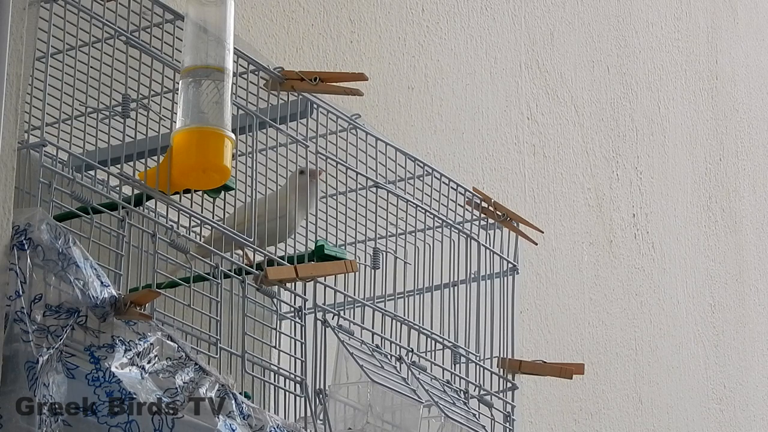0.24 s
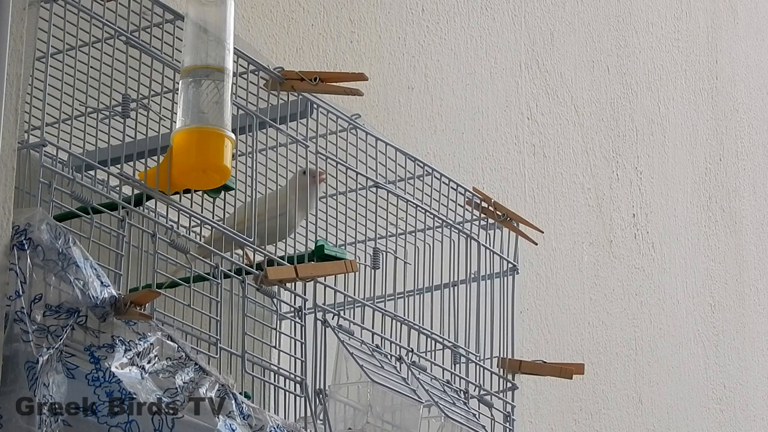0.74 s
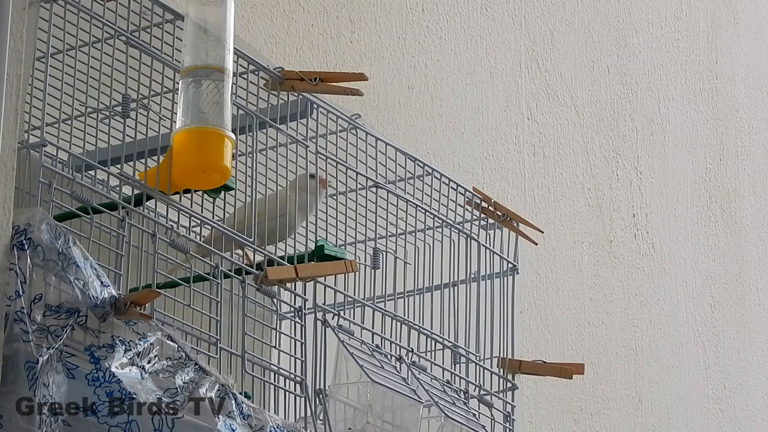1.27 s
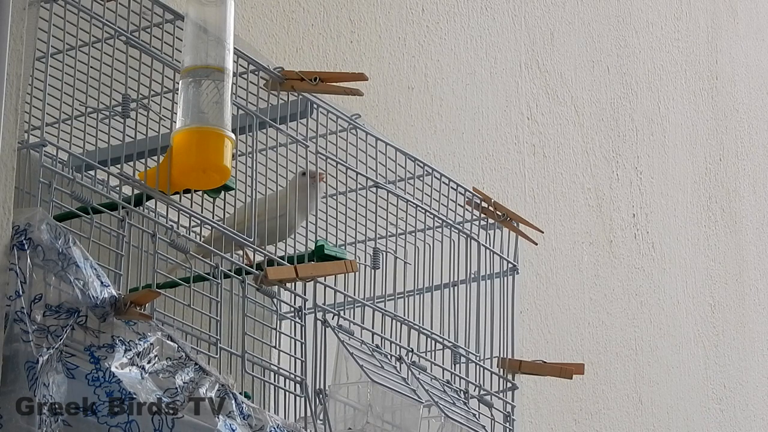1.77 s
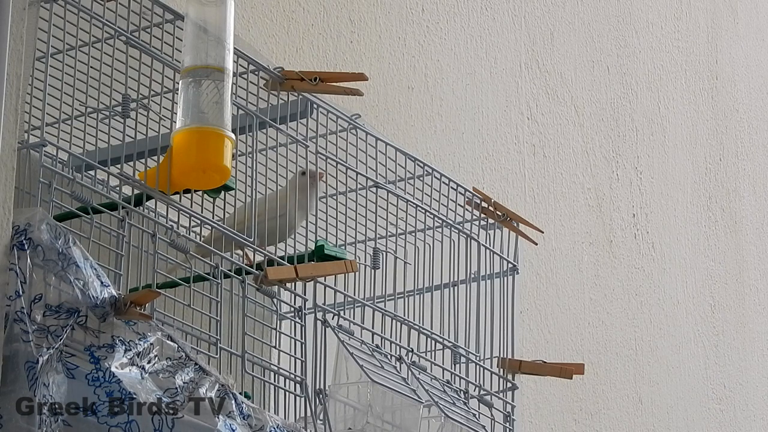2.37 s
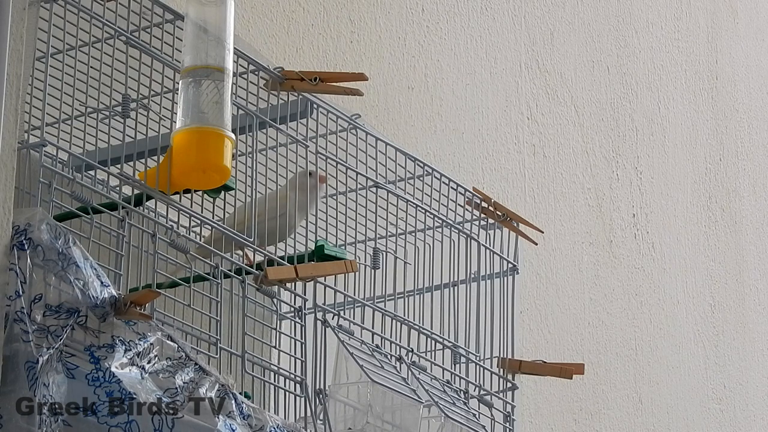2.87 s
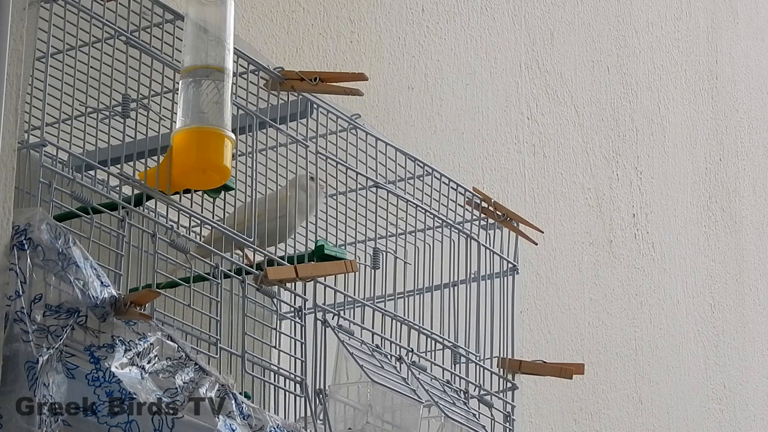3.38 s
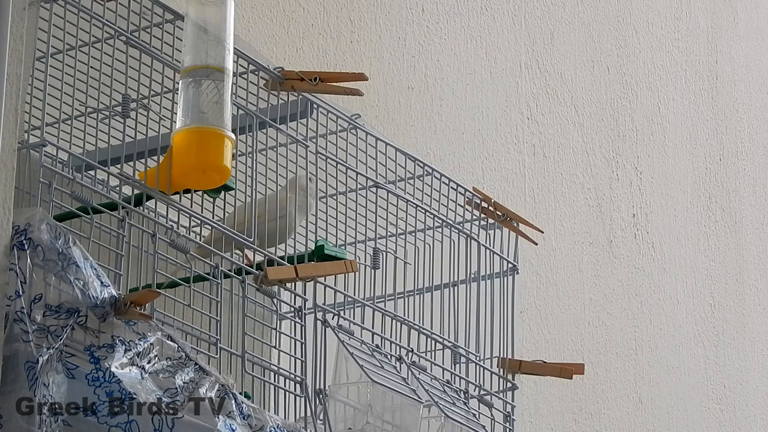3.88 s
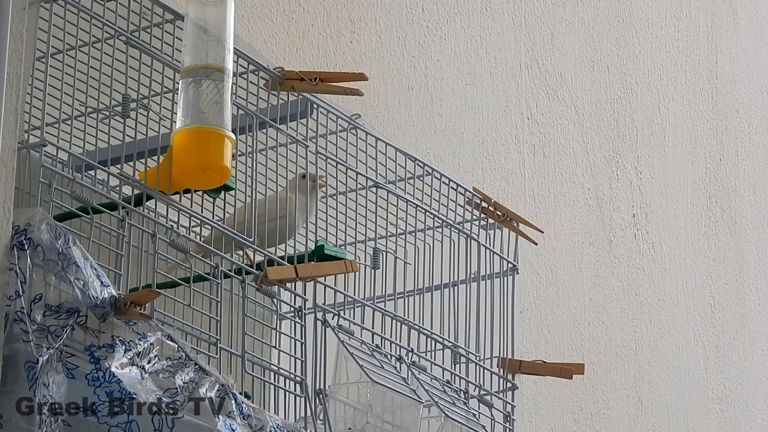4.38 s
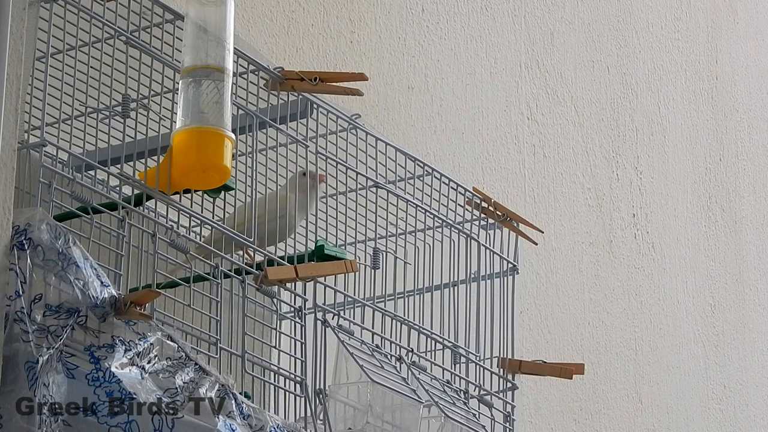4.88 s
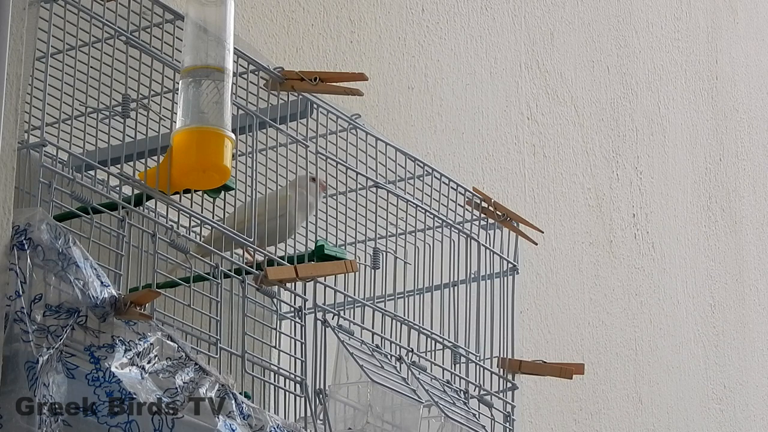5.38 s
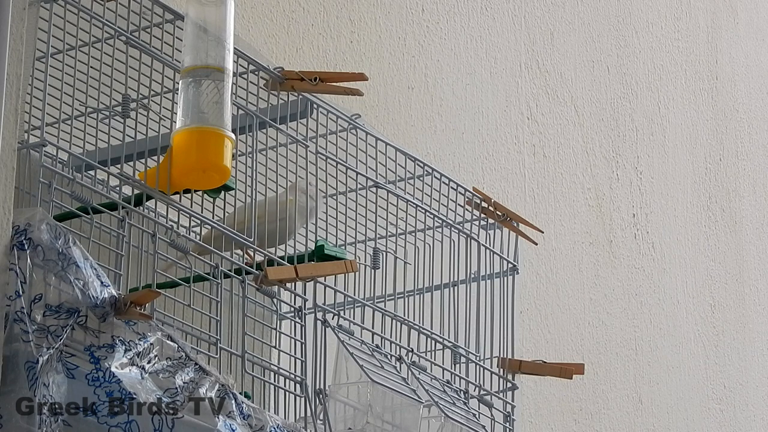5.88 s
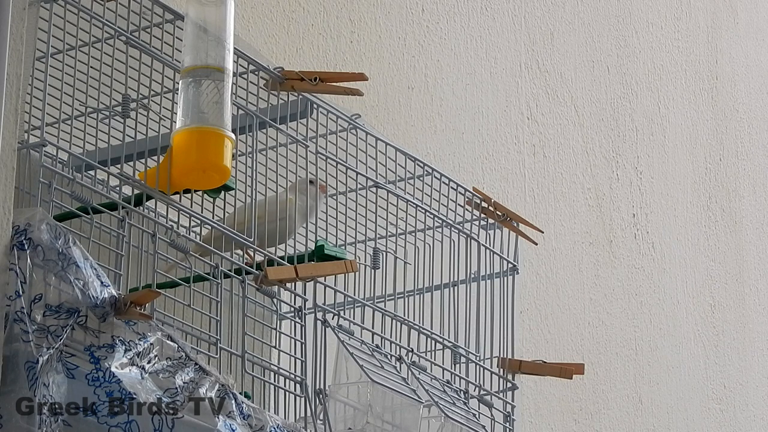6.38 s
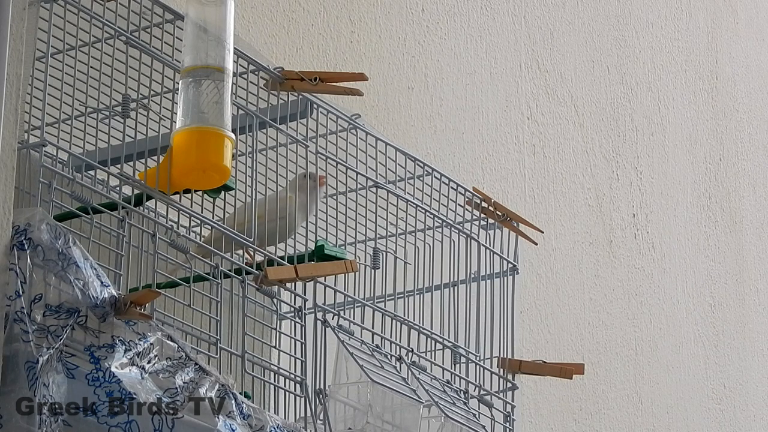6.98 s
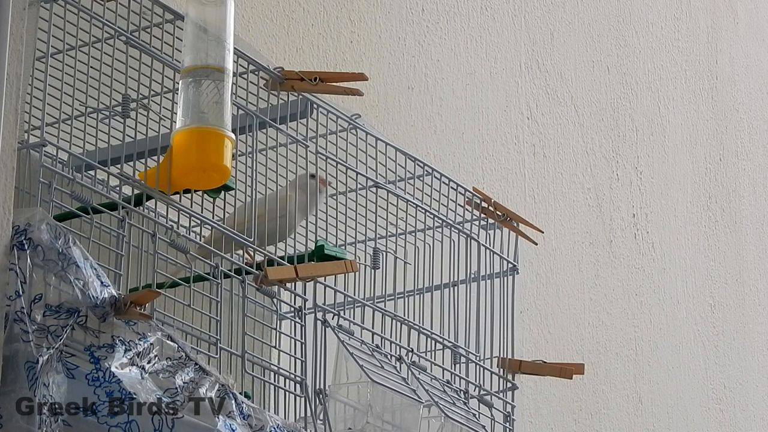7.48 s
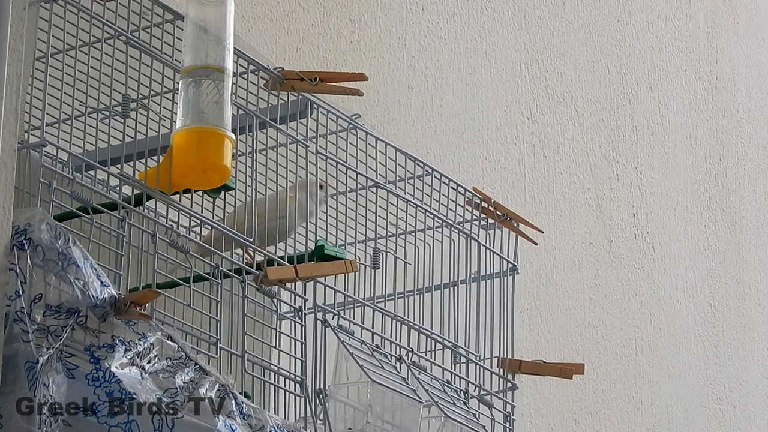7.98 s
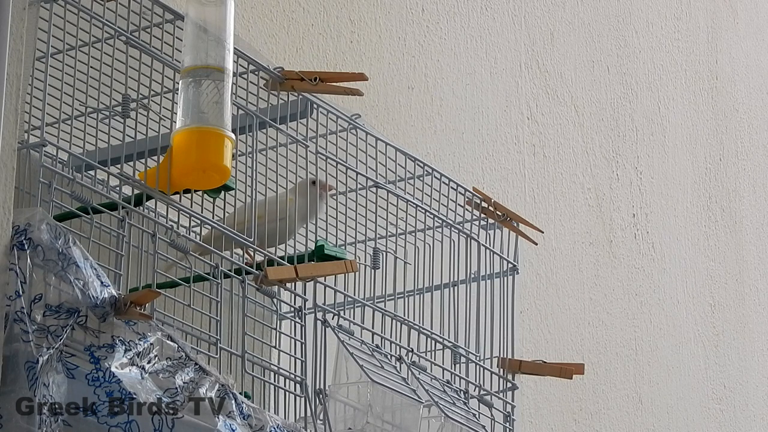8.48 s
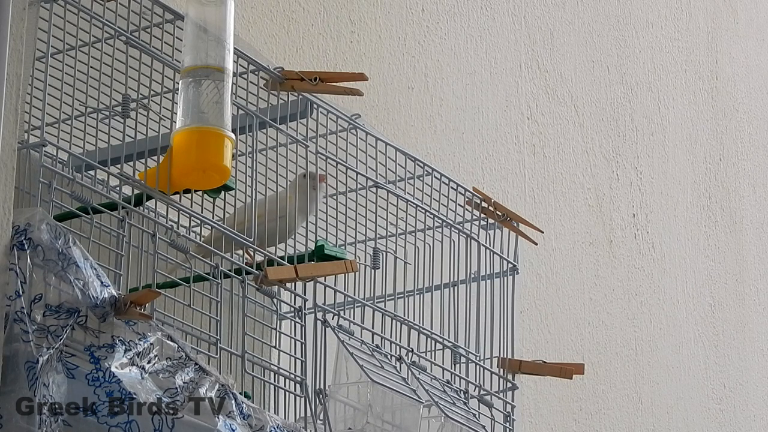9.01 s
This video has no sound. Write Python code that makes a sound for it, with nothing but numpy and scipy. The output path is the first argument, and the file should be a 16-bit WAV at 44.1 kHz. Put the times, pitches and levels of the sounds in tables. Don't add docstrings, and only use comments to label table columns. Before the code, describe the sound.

A canary sings brightly in a hard-walled room, changing from fast rolls to chopped notes, whips and bubbling trills, over faint town hum.

```python
import sys
import numpy as np
from scipy import signal
from scipy.fft import rfft, irfft
from scipy.io import wavfile
from scipy.ndimage import uniform_filter1d

SR = 44100
rng = np.random.default_rng(int(sys.argv[2]) if len(sys.argv) > 2 else 0)


def voltage_ratio(decibels):
    exponent = np.asarray(decibels, float) / 20
    return 10 ** exponent


def master(y):
    cut = np.clip(np.atleast_2d(y).T, -1, 1)
    pcm = np.round(cut * 32767)
    wavfile.write(sys.argv[1], SR, pcm.astype(np.int16))


N = 407925
LEAD = SR // 2

# time_s [s from the syllable], pitch_hz [Hz], level_db [dB]
ROLL_SHAPE = [
    [(0, 4750, 6), (.004, 4280, -3), (.012, 4010, -4), (.017, 3400, -0.5), (.022, 2960, -10.5),
     (.028, 2460, -11)],
]
PIP_SHAPE = [
    [(-.018, 6800, -35), (-.013, 6670, -9.5), (-.008, 6600, 0.5)],
]
TRIPLE_SHAPE = [
    [(-.028, 5190, -15.5), (.002, 4605, -1), (.03, 4324, -5), (.065, 4090, -11.5)],
    [(.068, 3690, -16), (.078, 3484, -1), (.096, 3420, -8.5)],
    [(.101, 2000, -7.5), (.107, 2600, -4.5), (.114, 2783, 0.5), (.132, 2880, -9)],
]
CHOP_SHAPE = [
    [(-.008, 4665, -8), (.008, 4110, -2.5), (.022, 3680, -2), (.032, 3460, -11.5)],
]
CLUCK_SHAPE = [
    [(.032, 2214, -15.5), (.037, 2664, -4), (.046, 2745, 4), (.06, 2598, -11.5)],
]
SCOOP_SHAPE = [
    [(-.014, 2736, -25), (0, 3210, 0), (.022, 3708, -1.5), (.045, 3980, -7.5), (.06, 4190, -19)],
]
BUBBLE_SHAPE = [
    [(-.006, 3055, 9), (-.001, 3280, -9), (.007, 3596, 0.5), (.011, 2750, -17), (.015, 2180, -9)],
    [(.02, 1976, -8), (.026, 2480, -9.5), (.031, 2990, -5), (.037, 3346, -10)],
    [(.025, 5380, 2), (.029, 4720, -11), (.034, 3840, -13.5)],
]
BELL_SHAPE = [
    [(.014, 4230, -5), (.019, 3870, -5), (.027, 3753, -1.5), (.032, 3430, 0.5), (.037, 3100, -2),
     (.043, 2750, -6.5)],
]
TICK_SHAPE = [
    [(-.003, 4520, -22.5), (0, 4680, -1), (.004, 4344, -7), (.008, 4250, -15.5), (.016, 4050, -18)],
]
WHIP_SHAPE = [
    [(0, 3025, -9.5), (.011, 3915, 0.5), (.018, 4850, 3), (.025, 5590, 2.5), (.037, 6134, 0.5),
     (.052, 6173, -11)],
]
PICKUP_SHAPE = [
    [(-.031, 1820, -10), (-.026, 2310, -7), (-.018, 2646, -5.5)],
]
CLOSE_SHAPE = [
    [(-.03, 1610, -22.5), (-.022, 2272, -12), (-.013, 2630, -9)],
    [(-.006, 2750, -17), (.006, 3197, -2), (.015, 3708, -2), (.028, 3975, -1), (.052, 4170, -9.5)],
]
ROLL = .065, [(-.098, 1, 0.84), (.156, -4.5, 0.87), (.416, -2.4, .88), (.682, -3, 0.86)]
TRIPLES = .3, [(1.1, -0.95, 1.0), (1.405, 0.24, .98), (1.705, -0.035, 0.99)]
CHOPS = .132, [(1.897, -1, 0.96), (2.684, 0.14, 0.96), (2.937, -1.2, 0.97), (3.202, -1.8, 0.95),
         (3.484, -1.4, 0.97)]
CLUCKS = .132, [(1.897, -3, 0.97), (2.684, -3, 0.97), (2.937, -3.5, 0.98), (3.203, -1.5, 0.99),
          (3.34, 1.5, 1), (3.483, -1.5, 0.99)]
SCOOPS = .3, [(3.614, -1.1, 0.98), (3.937, -1.2, 1.0), (4.227, 0.63, 1.0)]
BUBBLE = .0535, [(4.639, 1.5, .9), (4.85, 1.5, .94), (5.171, 0.6, .98), (5.227, 1, .96), (5.282, -5.5, .99)]
BELL = .0735, [(5.418, -1.5, 0.93), (5.497, -1, 0.95), (6.007, -1.17, .94), (6.379, -1.5, 0.99),
        (6.816, 1, 1)]
TICKS = .0735, [(5.418, 0, 0.95), (5.497, -1, 0.98), (5.569, -3, 0.96), (6.007, -1, 0.97), (6.379, 2, 0.99),
         (6.523, 0, 0.98), (6.816, 1.5, 1)]
WHIPS = .115, [(6.919, 0.38, .98), (7.04, 1.5, 1.0), (7.262, 1.5, 1), (7.724, 1.1, .95), (7.836, 0.48, .88),
         (7.95, 0.51, .59)]
CLOSE = .106, [(8.06, -0.77, 1.1), (8.166, -1.2, 1.06), (8.394, -.2, 0.94), (8.501, -.4, 0.93),
         (8.597, -0.73, 0.95), (9.118, -1.1, .87), (9.215, -1.5, 1.05)]


def evened(x):
    return x / np.sqrt(np.mean(x ** 2) + 1e-20)


def read(points, hz):
    point_hz, value = np.transpose(points)
    return np.interp(np.log(hz + 1), np.log(point_hz + 1), value)


def add(mix, start_s, sound):
    part = mix[LEAD + round(start_s * SR):][:len(sound)]
    part += sound[:len(part)]


def whistle(hz, db, partials_db, edge_s):
    # pitch_hz [Hz], level_db [dB]
    beak = [(1500, 0.5), (2300, -1.5), (2750, 1), (3120, -1.5), (3450, 3.5), (3780, 3.5), (4150, -1),
            (4700, -5), (5500, -10), (6300, -5.5), (7300, -15), (9000, 5), (12000, 2.5), (15000, 0)]
    n = len(hz)
    pitch_wobble, level_wobble = evened(uniform_filter1d(rng.standard_normal((2, n)), 60))
    hz = hz * (1 + 0.0058 * pitch_wobble + 0.00604 * rng.standard_normal())
    turn = 2 * np.pi * (np.cumsum(hz) / SR + rng.random())
    tone = np.zeros(n)
    for k, partial_db in enumerate([0, *partials_db], 1):
        audible = k * hz < SR / 2.4
        tone += voltage_ratio(partial_db + read(beak, k * hz)) * audible * np.sin(k * turn)
    fade = signal.windows.tukey(n, np.clip(2 * edge_s * SR / n, 0, 1))
    return tone * voltage_ratio(db + 0.63 * level_wobble) * fade


def syllables(beat_s, marks):
    marks = np.array(marks, float)
    beats = np.round(np.diff(marks[:, 0], prepend=marks[0, 0]) / beat_s)
    index = np.cumsum(beats)
    count = np.arange(index[-1] + 1)
    return np.transpose([np.interp(count, index, column) for column in marks.T])


def glides():
    # [dB, overtones]
    phrases = [(ROLL, ROLL_SHAPE, -22, 0, -20.5, -26.5, -28), (ROLL, PIP_SHAPE, -17.5, 9000, -30, -30, -40),
               (TRIPLES, TRIPLE_SHAPE, -18.5, 0, -28.5, -29, -36),
               (CHOPS, CHOP_SHAPE, -16.5, 0, -19, -25, -28), (CLUCKS, CLUCK_SHAPE, -16.5, 0, -34, -27, -56),
               (SCOOPS, SCOOP_SHAPE, -18.5, 0, -22.5, -29, -31),
               (BUBBLE, BUBBLE_SHAPE, -25.5, 0, -19.5, -25.5, -29.5),
               (BELL, BELL_SHAPE, -23.5, 0, -21, -26, -28.5),
               (TICKS, TICK_SHAPE, -23.5, 0, -17.5, -27, -39),
               (WHIPS, WHIP_SHAPE, -18.5, 2700, -33.5, -25.5, -35),
               (WHIPS, PICKUP_SHAPE, -20, 3000, -65, -44, -30),
               (CLOSE, CLOSE_SHAPE, -15, 3000, -24.5, -29, -33.5)]
    out = np.zeros(LEAD + N)
    for pacing, shape, level_db, pivot_hz, *partials_db in phrases:
        for start_s, effort_db, reach in syllables(*pacing):
            for note in shape:
                time_s, note_hz, note_db = np.transpose(sorted(note))
                t = np.arange(time_s[0], time_s[-1], 1 / SR)
                hz = uniform_filter1d(np.interp(t, time_s, note_hz), size=100, mode="nearest")
                hz = hz + (reach - 1) * np.maximum(hz - pivot_hz, 0)
                db = level_db + effort_db + 0.9 * rng.standard_normal() + np.interp(t, time_s, note_db)
                add(out, start_s + time_s[0], whistle(hz, db, partials_db, 0.0016))
    return out


def flutes():
    # second_db [dB, second partial], then notes of
    # start_s [s], length_s [s], first_hz [Hz], held_hz [Hz], level_db [dB]
    families = [
        (-34, [(.838, 0.067, 4750, 4360, -18.5)]),
        (-28, [(.967, 0.047, 6960, 6570, -28.5), (1.263, .07, 6800, 6400, -32), (1.57, 0.07, 6870, 6100, -33)]),
        (-17.5, [(3.668, .13, 5453, 5377, -26.5), (3.998, 0.1, 5590, 5474, -24), (4.284, .115, 5590, 5460, -22.5)]),
        (-28, [(4.03, 0.1, 7000, 7050, -46), (4.31, .069, 7240, 7000, -41)]),
        (-21, [(4.538, 0.015, 1940, 2126, -33.5), (4.551, 0.014, 4350, 4710, -19.5), (4.565, 0.0049, 3900, 3780, -21.5)]),
    ]
    out = np.zeros(LEAD + N)
    for second_db, notes in families:
        for start_s, length_s, first_hz, held_hz, db in notes:
            progress = np.linspace(0, 1, round(length_s * SR))
            hz = held_hz + (first_hz - held_hz) * (1 - progress) ** 3.82
            add(out, start_s, whistle(hz, db, [second_db, -34], 0.021))
    return out


def song():
    return glides() + flutes()


def tail():
    # pitch_hz [Hz], time_s [s to fall by 60 dB]
    decay = [(1500, 0.51), (3000, 0.44), (5000, 0.52), (9000, 0.52), (15000, 0.56)]
    # delay_s [s], level_db [dB]
    walls = [
        (.0021, -0.5),
        (.0047, -13),
        (.0083, -5.5),
        (0.012, -32),
        (.019, -2.5),
    ]
    taps = np.zeros((2, SR))
    at = np.arange(120, SR - 10, 10) + rng.integers(0, 10, (2, (SR - 121) // 10))
    np.put_along_axis(taps, at, rng.choice([-1., 1.], at.shape), 1)
    hz, t, z = signal.stft(taps, SR, nperseg=256)
    fading = z * voltage_ratio(-60 * t / read(decay, hz)[:, None])
    out = signal.istft(fading, SR, nperseg=256)[1][:, :3 * SR // 4]
    out = voltage_ratio(3.5) * evened(out) / np.sqrt(out.shape[1])
    for delay_s, db in walls:
        arrival = round(delay_s * SR) + rng.integers(0, 12, 2)
        out[[0, 1], arrival] += voltage_ratio(db - 7.0) * rng.choice([-1, 1])
    return out


def room(x):
    # pitch_hz [Hz], level_db [dB]
    front = [(5000, -0.5), (8000, 1), (15000, -6)]
    head = 2 * np.pi * 0.448 * np.arange(len(x)) / SR
    wet = np.zeros((2, len(x)))
    for weight in (np.cos(head), np.sin(head)):
        wet += signal.oaconvolve((x * weight)[None], tail(), axes=1)[:, :len(x)]
    hz = np.fft.rfftfreq(len(x), 1 / SR)
    x = irfft(rfft(x) * voltage_ratio(read(front, hz)), len(x))
    direct = voltage_ratio(-4) * np.array([x, np.roll(x, shift=4)])
    return (wet + direct)[:, LEAD:]


def hum():
    # pitch_hz [Hz], level_db [dB per Hz]
    town_curve = [(15, -67), (25, 4.5), (76, -3.5), (179, -8), (255, -12), (385, -11.5), (879, -16),
                  (1100, -19.5), (1380, -21.5), (2200, -67), (2860, -73), (4840, -120)]
    # pitch_hz [Hz], level_db [dB per Hz]
    air_curve = [(1500, 7), (2600, 2), (5000, -4), (8000, -7.5), (12000, -8.5), (16000, -13)]
    # time_s [s], level_db [dB]
    rumble = [(0.0, -34.5), (0.8, -49), (2.47, -52.5), (7.29, -57.5), (7.73, -56), (9.25, -47)]
    # pitch_hz [Hz], likeness [1 = the same]
    likeness = [(60, 0.92), (180, 0.74), (550, 0.69), (1650, 0.34), (4970, -0.042), (15000, -0.19)]
    engines = [(25, -40), (40, -7), (48, -5), (62, -8.5), (85, -49), (200, -90)]  # (Hz, dB)
    town_db, air_db = -37, -47
    frames, hz = N // 512 + 6, np.fft.rfftfreq(2048, 1 / SR)
    a, b, c, d, patches = rng.standard_normal((frames, 1025, 5)).T
    patches = uniform_filter1d(patches, size=20, axis=0)
    patches = evened(uniform_filter1d(patches, size=12, axis=1))
    curves = (town_curve, [(300, -30)] + air_curve, engines)
    town, air, low = (evened(voltage_ratio(read(curve, hz)))[:, None] for curve in curves)
    swell_db = np.interp(np.arange(frames) * 512 / SR, *np.transpose(rumble))
    power = (voltage_ratio(town_db) * town) ** 2 + (voltage_ratio(air_db) * air) ** 2 + (voltage_ratio(swell_db + 4.0) * low) ** 2
    size = np.sqrt(power)
    same = np.clip(read(likeness, hz), -1, 1)[:, None]
    left = a + 1j * b
    right = same * left + np.sqrt(1 - same ** 2) * (c + 1j * d)
    z = np.array([left, right]) * size * voltage_ratio(0.66 * patches)
    noise = signal.istft(z, nperseg=2048, noverlap=1536)[1][:, :N]
    return evened(noise) * np.sqrt(np.mean(size ** 2))


def horn():
    # time_s [s], pitch_hz [Hz], level_db [dB]
    course = [
        (8.55, 557, -42),
        (9.036, 550.2, -45),
        (9.25, 543, -33),
    ]
    t = np.arange(N) / SR
    time_s, pitch_hz, level_db = np.transpose(course)
    turn = 2 * np.pi * np.cumsum(np.interp(t, time_s, pitch_hz)) / SR
    return voltage_ratio(np.interp(t, time_s, level_db, left=-99) - 6) * np.sin(turn)


def traffic():
    return hum() + horn()


def scene():
    # time_s [s], level_db [dB]
    facing = [(0, 0.1), (2, 0.4), (4, .2), (6, 0.3), (8, 0.45), (9.25, 0.4)]
    turn_db = np.interp(np.arange(N) / SR, *np.transpose(facing))
    bird = room(song()) * voltage_ratio(np.array([turn_db, -turn_db]))
    return bird + traffic() * voltage_ratio(np.array([[.6], [-.6]]))


def masked(x):
    # pitch_hz [Hz], margin_db [dB]
    mask = [(4300, 23), (4800, 28.5), (6000, 31.5), (7000, 27.5), (8000, 28.5), (9500, 32.5), (13000, 30.5),
            (15500, 28.5)]
    hz, _, z = signal.stft(x, SR, nperseg=2048, noverlap=1024, window="cosine")
    bands = z[:, :1024].reshape(2, 64, 16, -1)
    band_db = 10 * np.log10((abs(bands) ** 2).mean((0, 2)) + 1e-20)
    centre_hz = hz[8:1024:16, None]
    band = np.arange(len(band_db))[:, None]
    always_kept_db = 99 * (centre_hz < mask[0][0])
    slope_db = 1.67 * band
    masker_db = np.maximum.accumulate(band_db + slope_db, axis=0) - slope_db
    margin_db = band_db - masker_db + read(mask, centre_hz) + always_kept_db
    steep_db = 4.5 * band
    near_masker_db = np.maximum.accumulate(band_db + steep_db, axis=0) - steep_db
    near_db = band_db - near_masker_db + 25
    margin_db = np.minimum(margin_db, near_db + always_kept_db)
    margin_db = margin_db - 2.5 + 2.5 * rng.standard_normal(margin_db.shape)
    kept = (centre_hz < 15800) / (1 + np.exp(-np.clip(6 * margin_db, -30, 30)))
    z[:, :1024] *= np.repeat(kept, 16, 0)
    return signal.istft(z, SR, nperseg=2048, noverlap=1024, window="cosine")[1][:, :N]


def band_limit(x):
    return signal.sosfilt(signal.butter(12, 15750, fs=SR, output="sos"), x)


def record(dry):
    low_cut = signal.butter(4, 39, "high", fs=SR, output="sos")
    heard = signal.sosfilt(low_cut, dry)
    return band_limit(masked(heard) - .0019)


dry = scene()
out = record(dry)
master(out)
```